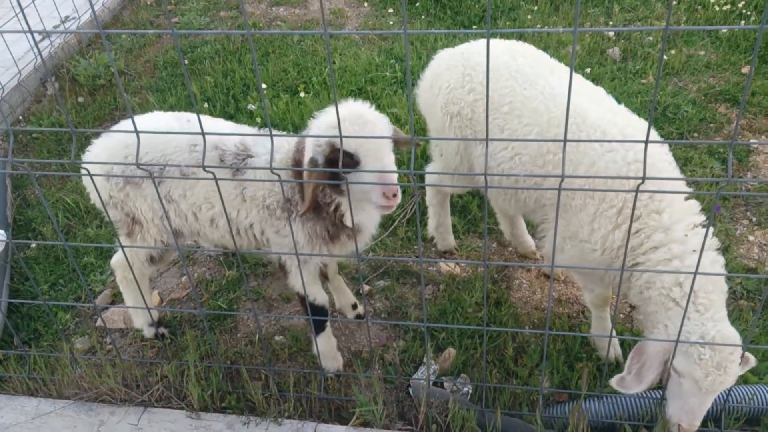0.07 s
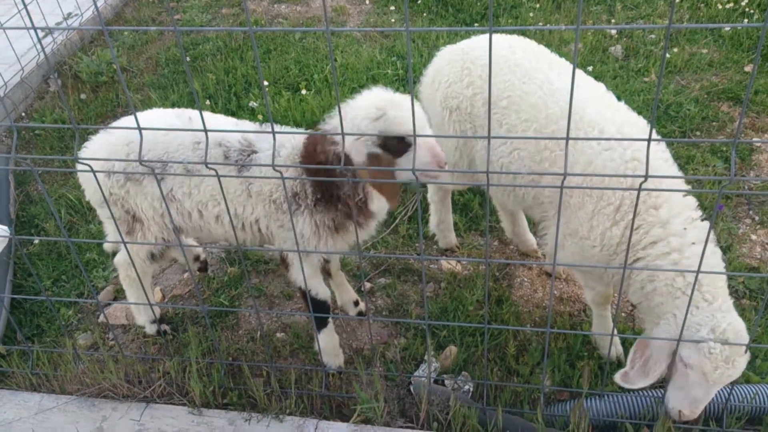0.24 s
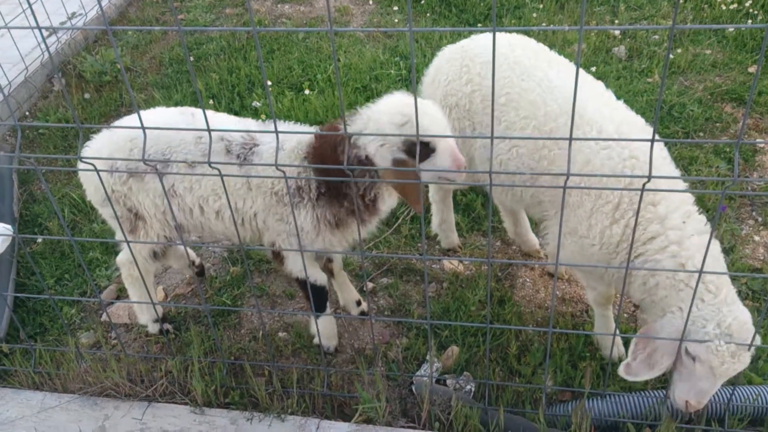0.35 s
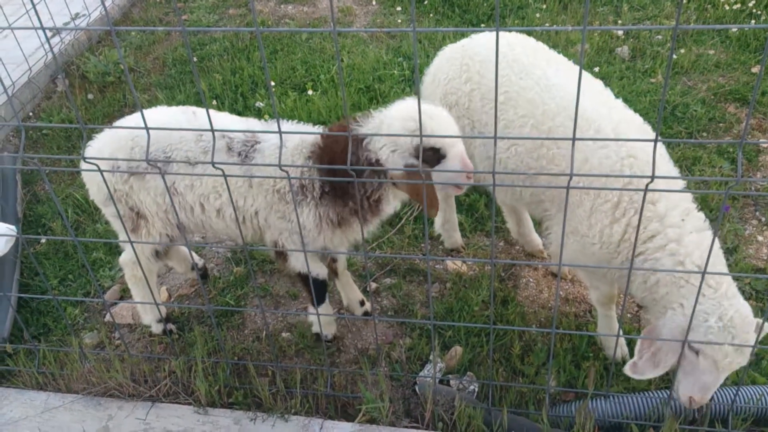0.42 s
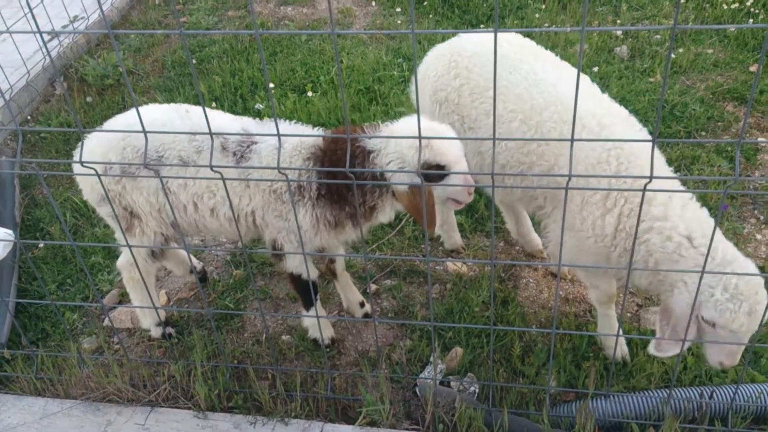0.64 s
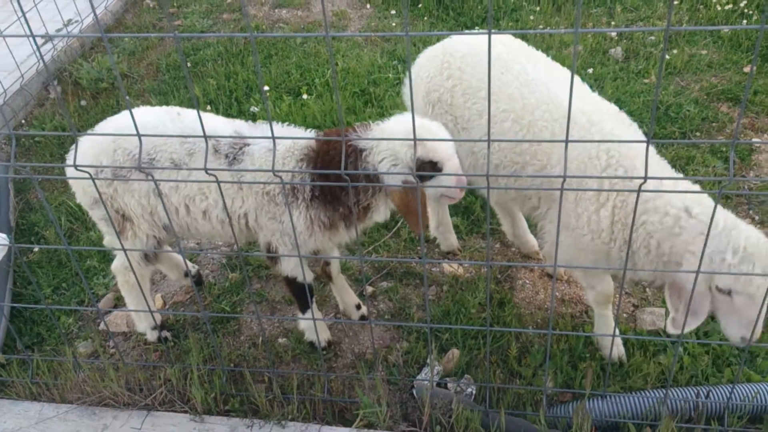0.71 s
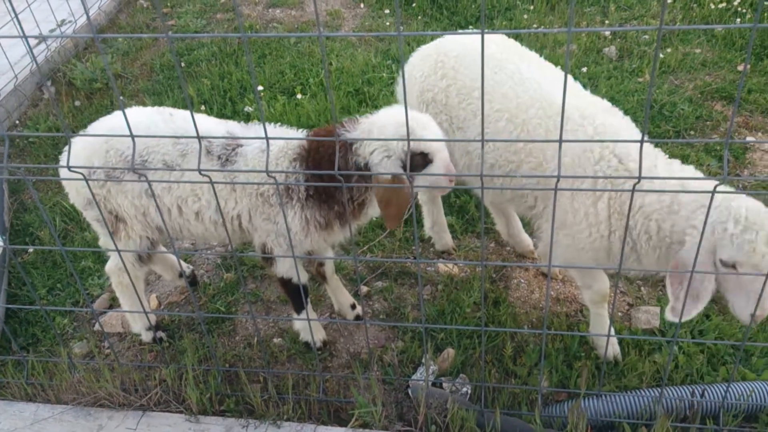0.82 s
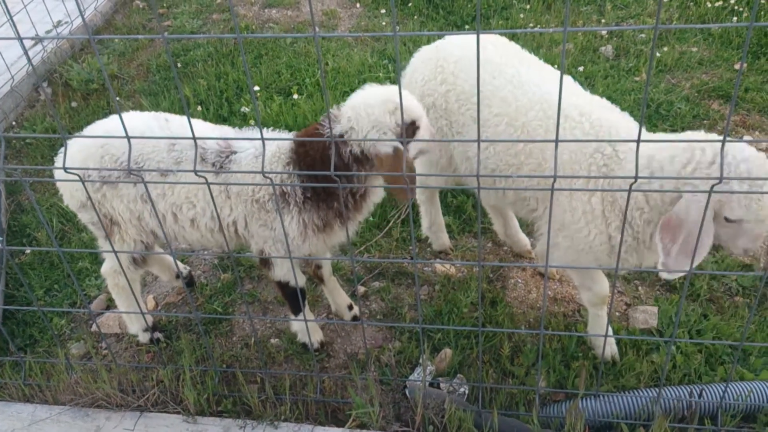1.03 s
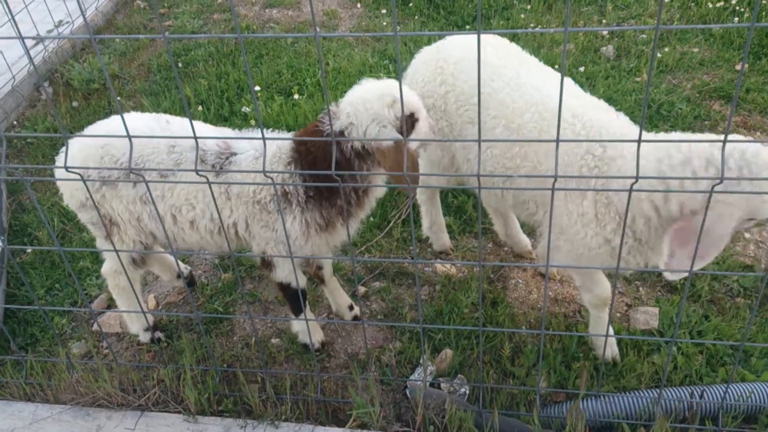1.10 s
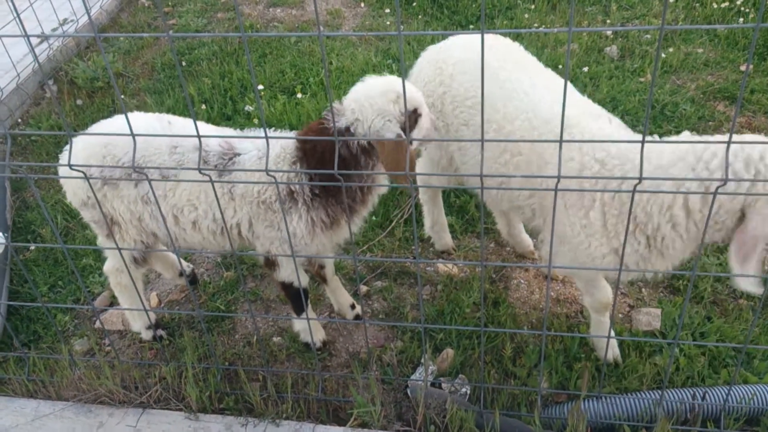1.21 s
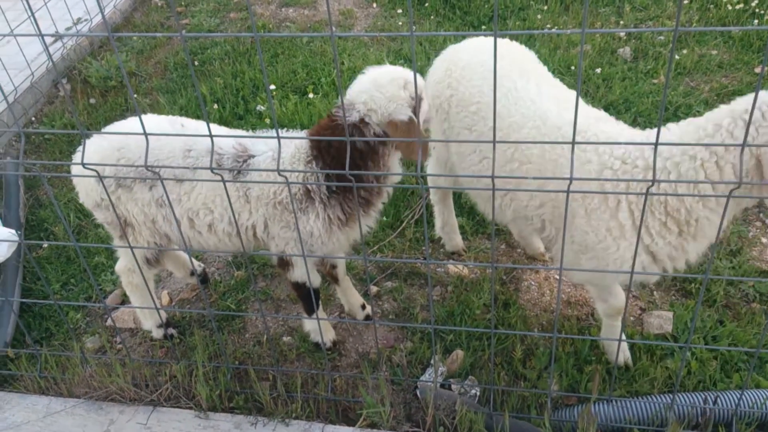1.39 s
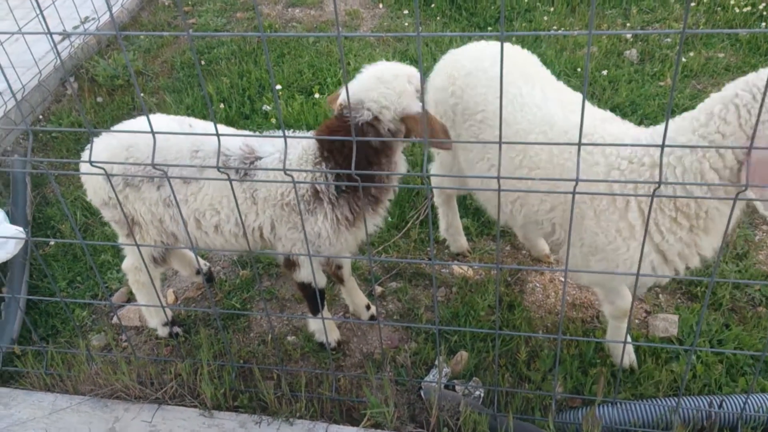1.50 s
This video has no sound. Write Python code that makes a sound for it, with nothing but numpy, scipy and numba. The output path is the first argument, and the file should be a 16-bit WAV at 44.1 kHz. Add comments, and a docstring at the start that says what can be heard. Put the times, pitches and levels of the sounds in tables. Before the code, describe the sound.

A sheep bleats once, close by. From about 0.1 seconds come three low, muffled grunts, opening at 0.4 into a loud, harsh, fast-quavering baa that stops abruptly at 0.8. A dove coos very faintly far off. Around 1 second a hoof softly scuffs the grass and light wind bumps the microphone. Faint bird chirps and a slight low drone follow over the countryside hush until about 1.5 seconds.

```python
"""A sheep bleats once, close by, in a fenced pasture: three low grunts through a nearly shut mouth,
then a harsh, fast-quavering "baa" that stops abruptly. Pulses from its vocal folds and rough breath
make its throat ring, and the sound brightens as the mouth opens. Far off, a dove coos and small
birds chirp in gliding whistles. Light wind nudges the microphone, a hoof scuffs the grass,
and a faint low drone swells under the hush of the countryside."""
import sys
import numpy as np
from scipy import signal
from scipy.fft import rfft, irfft
from scipy.io import wavfile
from scipy.ndimage import uniform_filter1d
from numba import njit

SR = 44100
rng = np.random.default_rng(int(sys.argv[2]) if len(sys.argv) > 2 else 0)


def store_pcm(level_fs):
    """Save levels as 16-bit WAV."""
    pcm = np.round(np.clip(level_fs, -1, 1) * 32767).astype(np.int16)
    wavfile.write(sys.argv[1], SR, np.atleast_2d(pcm).T)


N = 68355
T = np.arange(N) / SR

# tone of the far hush: f/Hz, relative level/dB
HUSH_SPECTRUM = [(59, -78), (100, 3), (169, -2.5), (241, -7.5), (407, -3.5), (594, -6), (718, -4.5),
                 (1660, -14), (3530, -13), (10700, -26.5), (15000, -31.5)]
# rise and fall of the hush: t/s, relative level/dB
HUSH_SWELL = [(0, 9), (.8, 15), (1.1, 13), (1.3, 11), (1.55, 6)]
# gusts on the microphone: t/s, relative level/dB
GUSTS = [(0, -44), (.06, -63), (.12, -48.5), (.2, -42), (.3, -50.5), (.55, -54.5), (.78, -66), (.85, -45),
         (.92, -50.5), (.97, -52), (1.02, -44.5), (1.08, -43.5), (1.17, -55), (1.25, -66.5), (1.42, -57.5),
         (1.55, -59.5)]
# tone of the wind: f/Hz, relative level/dB
WIND_SPECTRUM = [(10, 4.5), (30, -16.5), (70, -19), (120, -39.5), (250, -31), (600, -79)]
# the dove's notes: start t/s, length/s, first f/Hz, last f/Hz, level/dB
DOVE_NOTES = [(0.079, 0.084, 436, 548, -59), (0.617, 0.31, 485.4, 410, -58), (1.52, 0.09, 443, 497, -58.5)]
# the sheep's pitch and effort: t/s, f/Hz, relative level/dB
PITCH_AND_EFFORT = [(.118, 159.3, -40.5), (.134, 164.9, -20.5), (.164, 176.7, -15), (.182, 164.3, -25),
                    (.224, 199, -8.5), (.252, 168.3, -18), (.286, 213.3, -6.5), (.318, 183.5, -14),
                    (.344, 221.7, -10), (.40, 216.2, -5.5), (.43, 220.6, -5), (.545, 217.1, -4.5),
                    (.575, 229.4, -4), (.665, 230.4, -4), (.695, 220.1, -6), (.738, 214.8, -7.5),
                    (.76, 190.6, -14), (.774, 185.3, -32), (.79, 191.1, -58)]
# the sheep's mouth and the roughness of its voice: t/s, opening/0-1, rasp/0-1
OPENING_AND_RASP = [(.13, 0, 1), (.26, 0.18, 1), (.30, 0.29, 1), (.35, .48, 0.7), (.39, 0.49, 0.42),
                    (.44, 0.75, 0.93), (.52, 0.89, 0.96), (.59, 0.88, 1), (.76, 0.91, 0.83)]
# resonances (ringing pitches) of throat and mouth: f/Hz with the mouth shut, half open, open;
# width/Hz; relative level/dB shut, half open, open; left minus right/dB
RESONANCES = [(180.4, 200, 191, 34, -28, -25, -30.5, -6), (304, 393, 416, 48, -20, -23.5, -19, -6),
              (567, 719, 739.5, 64, -35, -8, -16, -4), (613, 860, 997, 109, -37.5, -21.5, -6, -5),
              (1160, 1110, 1048, 107, -26, -23, -9.5, -10), (1600, 1465, 1445, 100, -25.5, -29, -26, -1),
              (1980, 1830, 1943, 310, -30, -26.5, -29.5, 0.5), (2403, 2590, 2480, 297, -31, -28.5, -23, -2),
              (2524, 3110, 3505, 403, -37, -23, -11.5, 1), (3000, 3764, 4080, 290, -40, -21, -20, -8),
              (4300, 4335, 4450, 430, -51.5, -25.5, -26, -14.5),
              (4500, 5220, 5230, 430, -67, -29.5, -27, -0.5),
              (6900, 7090, 6590, 830, -53, -30, -22.5, -5.5), (8000, 7930, 8190, 970, -48, -41, -25, 5),
              (10400, 8800, 12300, 6400, -67, -45.5, -38, 20)]
# how far the nose is open to the throat: t/s, share/0-1
NOSE_OPENING = [(.39, 0), (.44, 1), (.5, 1), (.58, 0)]
# the bleat's bounce off the ground, left row then right row: delay/s, relative level/dB
GROUND_BOUNCE = [(.0021, -19), (.0033, -19)]
# the small birds' notes: start t/s, length/s, first f/Hz, last f/Hz, relative level/dB
BIRD_NOTES = [(0.987, 0.034, 5830, 5030, -79), (0.997, 0.025, 2780, 2660, -69.5),
              (1.06, .022, 5200, 4800, -70.5), (1.062, 0.029, 1680, 1690, -69),
              (1.09, 0.0122, 4740, 3645, -62), (1.127, 0.022, 3375, 4620, -62.5),
              (1.141, 0.07, 7320, 6340, -67), (1.188, 0.066, 7380, 6770, -73),
              (1.206, 0.16, 4710, 3270, -77.5), (1.211, .1, 6380, 5550, -84), (1.27, .1, 7370, 6770, -82.5),
              (1.418, 0.13, 7500, 6160, -79), (1.437, 0.04, 4330, 4110, -76.5),
              (1.465, 0.11, 7880, 7260, -82.5), (1.533, .025, 4300, 4260, -76)]
# harder puffs of wind: t/s, width/s, relative level/dB
PUFFS = [(1.0141, 0.0032, -37), (1.065, 0.0081, -54), (1.146, 0.0032, -50)]
# rise and fall of the low drone: t/s, level/dB
DRONE_SWELL = [(1.05, -85), (1.14, -65), (1.25, -63), (1.4, -72), (1.55, -73)]


def from_db(db):
    """Turn decibels into a gain to multiply by."""
    return 10 ** (np.asarray(db) / 20)


def unit_power(x):
    """Scale a sound to an average power of 1."""
    return x / np.sqrt(np.mean(x ** 2) + 1e-20)


def curves(rows):
    """Join a table's points in time, giving each column a value at every sample."""
    times, *columns = np.transpose(rows)
    return [np.interp(T, times, column) for column in columns]


def pan(db):
    """Left and right gains that differ by db; negative is to the right."""
    return from_db(np.array([[db], [-db]]) / 2)


def keep_band(x, hz, kind, order=2):
    """Keep what is below ("low") or above ("high") a frequency."""
    return signal.sosfilt(signal.butter(order, hz, kind, fs=SR, output="sos"), x)


def delayed(x, delay_s):
    """The same sound a little later."""
    return np.interp(T - delay_s, T, x, left=0)


def drift(hz):
    """A random wobble of typical size 1, mostly slower than hz."""
    return unit_power(keep_band(rng.standard_normal(2 * N), hz, "low")[N:])


def stereo_noise(shared):
    """White noise, with a share of its power common to both sides."""
    white = rng.standard_normal((3, N))
    return np.sqrt(shared) * white[2] + np.sqrt(1 - shared) * white[:2]


def coloured(noise, spectrum):
    """Give a noise the tone in a table, at a power of 1."""
    hz, db = np.transpose(spectrum)
    f = np.maximum(np.fft.rfftfreq(N, 1 / SR), 1)
    gain = from_db(np.interp(np.log(f), np.log(hz), db))
    return unit_power(irfft(rfft(noise) * gain, N))


def countryside(level_db=-78.5):
    """A far, even hush that swells and sinks."""
    swell_db, = curves(HUSH_SWELL)
    return from_db(level_db + swell_db) * pan(-5.5) * coloured(stereo_noise(shared=0.1), HUSH_SPECTRUM)


def wind(level_db=-1, fade_in_s=.012):
    """Gusts rumble on the microphone, mostly on the right; harder puffs push, then pull."""
    gust_db, = curves(GUSTS)
    rumble = from_db(level_db + gust_db) * coloured(stereo_noise(shared=0.3), WIND_SPECTRUM)
    puffs = 0
    for time_s, width_s, db in PUFFS:
        u = (T - time_s) / width_s
        push_pull = -2 * u / (1 + u * u)
        fade = np.exp(-np.abs(u) / np.where(u < 0, 2.5, 8))   # quick to come, slower to go
        puffs = puffs + from_db(db) * push_pull * fade
    return pan(-17.5) * np.minimum(T / fade_in_s, 1) * (rumble + puffs)


def whistle(start_s, length_s, from_hz, to_hz, db, bend_hz, warble):
    """One gliding bird note that swells and fades, its pitch bent in the middle."""
    progress = np.clip((T - start_s) / length_s, 0, 1)
    arch = np.sin(np.pi * progress)
    glide_hz = from_hz + (to_hz - from_hz) * progress + bend_hz * arch
    hz = glide_hz * (1 + warble * drift(159))
    return np.sqrt(2) * from_db(db) * arch * np.sin(2 * np.pi * np.cumsum(hz) / SR)


def dove():
    """A distant dove coos in soft, low, arching notes."""
    return pan(-7.5) * sum(whistle(*note, bend_hz=30.6, warble=0.0077) for note in DOVE_NOTES)


def vocal_folds(pitch_hz, rasp, quaver_hz=29.35, depth_hz=8.6, jitter_s=.000023, shimmer_db=1.4):
    """The folds chop the breath into quavering, slightly uneven pulses and bursts of airflow."""
    start_s, crest_s, end_s, fade_s = .405, .432, .73, .0535   # timing of the quaver
    quavering = np.clip(np.minimum(T - start_s, end_s - T) / fade_s, 0, 1)
    quaver = quavering * np.cos(2 * np.pi * quaver_hz * (T - crest_s))
    hz = pitch_hz + depth_hz * quaver + 2.8 * drift(38.4)
    phase = 2 * np.pi * (np.cumsum(hz) / SR + hz * jitter_s * rasp * drift(124))
    pulses = sum(np.cos(k * phase) for k in range(1, 66)) * np.sqrt(4 * hz / SR)
    pulses *= from_db(0.5 * quaver + shimmer_db * rasp * drift(64))
    airflow = rasp * unit_power(np.exp(0.067 * np.cos(phase)))   # a little stronger at each pulse
    return keep_band(pulses, 3030, "low", order=1), airflow


@njit
def resonate(x, angle, r):
    """Ring at a moving pitch (angle, in radians a sample); r nearer 1 rings longer."""
    y = np.zeros(len(x))
    for i in range(2, len(x)):
        drive = (1 - r * r) / 2 * (x[i] - x[i - 2])
        y[i] = drive + 2 * r * np.cos(angle[i]) * y[i - 1] - r * r * y[i - 2]
    return y


def cavity(x, hz, r, twice_above_hz=2200):
    """One throat resonance; high ones ring twice, which deepens the gaps between them."""
    angle = 2 * np.pi * hz / SR
    once = resonate(x, angle, r)
    return resonate(once, angle, r) if hz.max() > twice_above_hz else once


def evened(noise, window_s=0.00044):
    """Hold a noise's power steady from cycle to cycle."""
    return noise / np.sqrt(uniform_filter1d(noise * noise, int(window_s * SR)) + 1e-12)


def throat(pulses, airflow, opening, hiss_db=-14):
    """Pulses and rough breath ring the throat; opening the mouth retunes it and lets the treble out."""
    voice = 0
    for k, row in enumerate(RESONANCES):
        centres_hz, width_hz, levels_db, pan_db = row[:3], row[3], row[4:7], row[7]
        hz = np.interp(opening, [0, .5, 1], centres_hz)
        db = np.interp(opening, [0, .5, 1], levels_db)
        r = np.exp(-np.pi * width_hz / SR)
        breath = np.array([evened(cavity(side, hz, r)) for side in stereo_noise(shared=0.38)])
        hiss = from_db(hiss_db) * np.sqrt(1 - r) * keep_band(airflow * breath, 1100, "high")
        left, right = cavity(pulses, hz, r) + hiss
        lag_s = 1 / (2 * np.pi * centres_hz[-1])   # the sheep is a little nearer the left side
        ringing = np.array([left, delayed(right, lag_s)])
        voice = voice + (-1) ** k * pan(pan_db) * from_db(db) * ringing   # neighbours flip sign
    return voice


def nose(x, hz=1540, width_hz=300):
    """The nose swallows one band of the voice while it is open to the throat."""
    share, = curves(NOSE_OPENING)
    swallowed = signal.lfilter(*signal.iirpeak(hz, hz / width_hz, fs=SR), x)
    return x - share * swallowed


def smeared(x, longest_s=0.0063, above_hz=2100, spacing_hz=227.8, ripple_db=5):
    """The treble arrives by many short paths, so its delay and level vary with frequency."""
    f = np.fft.rfftfreq(N, 1 / SR)
    points_hz = np.arange(400) * spacing_hz
    treble = 1 / (1 + (above_hz / np.maximum(f, 1)) ** 8)
    delay_s = longest_s * treble * np.interp(f, points_hz, rng.random(len(points_hz)))
    db = ripple_db * treble * np.interp(f, points_hz, rng.standard_normal(len(points_hz)))
    phase = 2 * np.pi * np.cumsum(delay_s) * f[1]
    return irfft(rfft(x) * from_db(db) * np.exp(-1j * phase), N)


def sheep(stop_s=.79, fade_s=.012, top_hz=9240):
    """The bleat passes from the folds through throat and nose, and also bounces off the ground."""
    pitch_hz, effort_db = curves(PITCH_AND_EFFORT)
    opening, rasp = curves(OPENING_AND_RASP)
    pulses, airflow = vocal_folds(pitch_hz, rasp)
    voice = nose(throat(pulses, airflow, opening))
    voice *= from_db(effort_db) * np.clip((stop_s - T) / fade_s, 0, 1)
    voice = smeared(keep_band(voice, top_hz, "low", order=4))
    bounce = [from_db(db) * delayed(side, delay_s) for side, (delay_s, db) in zip(voice, GROUND_BOUNCE)]
    return voice + np.array(bounce)


def pasture_echo(x, db, decay_s=0.85, low_hz=1630, top_hz=4450):
    """The surroundings scatter a faint echo, different on each side."""
    tail = keep_band(rng.standard_normal((2, N)), top_hz, "low")
    tail *= from_db(-60 * T / decay_s) * (T > .01)
    tail /= np.sqrt(np.sum(tail ** 2) / 2)
    treble = keep_band(x, low_hz, "high", order=1)
    return from_db(db) * signal.fftconvolve(treble, tail, axes=1)[:, :N]


def leaves(x, blur_s=.012, blur_db=-3, level_db=-3, flicker_db=2.5):
    """Leaves and walls blur a distant call and make it flicker."""
    scatter = rng.standard_normal((2, N)) * np.exp(-T / blur_s)
    scatter /= np.sqrt(np.sum(scatter ** 2) / 2)
    blurred = signal.fftconvolve(x, scatter, axes=1)[:, :N]
    return from_db(level_db + flicker_db * drift(51)) * (x + from_db(blur_db) * blurred)


def small_birds():
    """Thin chirps come through the leaves on the right, with an echo."""
    chirps = pan(-15) * sum(whistle(*note, bend_hz=-69, warble=.009) for note in BIRD_NOTES)
    return leaves(chirps) + pasture_echo(chirps, db=-10)


def hoof(time_s=1.003, width_s=0.011, hz=686, level_db=-61.5):
    """A hoof lands softly in the grass with a short, dull scuff."""
    dull = keep_band(stereo_noise(shared=0.33), hz, "low", order=4)
    scuff = unit_power(keep_band(dull, hz, "high", order=4))
    return from_db(level_db) * np.exp(-((T - time_s) / width_s) ** 2 / 2) * scuff


def drone(centre_hz=73.5, waver_hz=3.35):
    """A faint, wavering low tone that swells after the bleat."""
    db, = curves(DRONE_SWELL)
    hz = centre_hz + waver_hz * drift(9.2)
    return pan(-3) * np.sqrt(2) * from_db(db) * np.sin(2 * np.pi * np.cumsum(hz) / SR)


def scene():
    """The sheep in front, with birds, wind and quiet countryside around it."""
    bleat = sheep()
    hush = countryside()
    echo = pasture_echo(bleat, db=-28)
    return bleat + echo + hush + hoof() + dove() + small_birds() + wind() + drone()


def record(dry, cutoff_hz=15400):
    """Cut the highest treble steeply."""
    return signal.sosfilt(signal.cheby2(12, 70, cutoff_hz, fs=SR, output="sos"), dry)


dry = scene()
out = record(dry)
store_pcm(out)
```